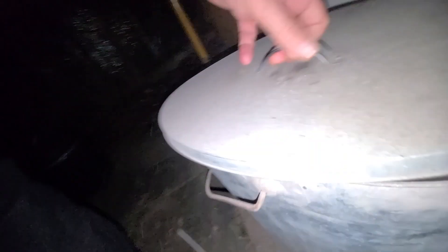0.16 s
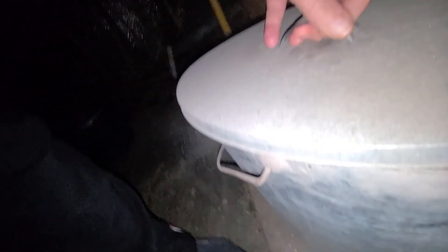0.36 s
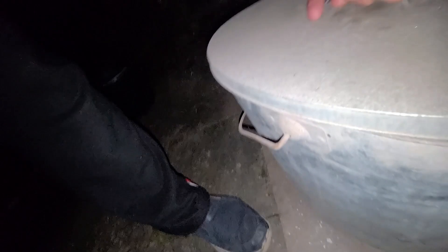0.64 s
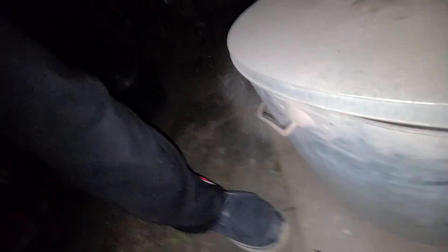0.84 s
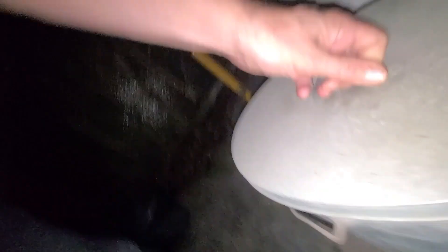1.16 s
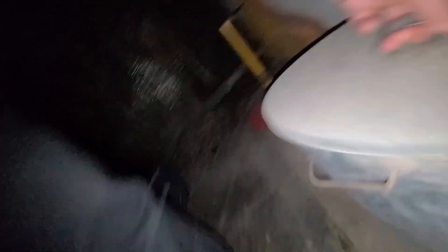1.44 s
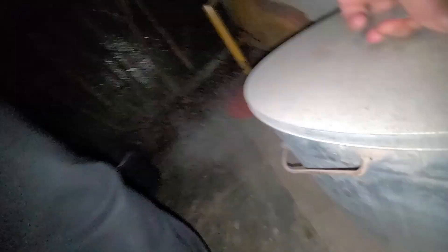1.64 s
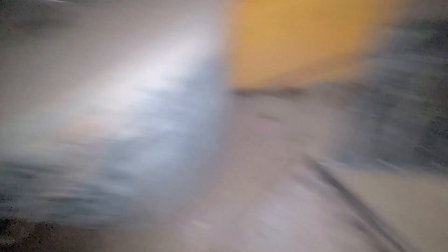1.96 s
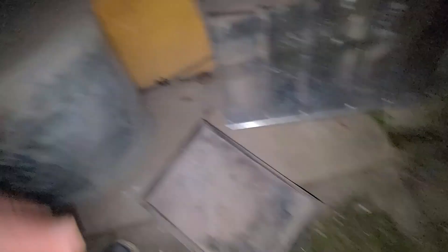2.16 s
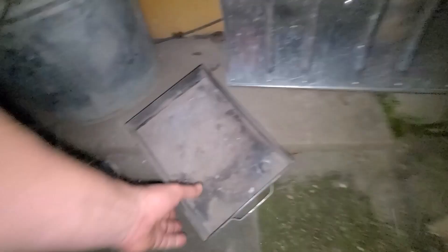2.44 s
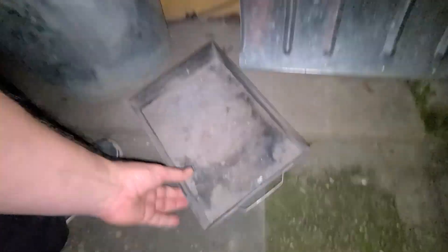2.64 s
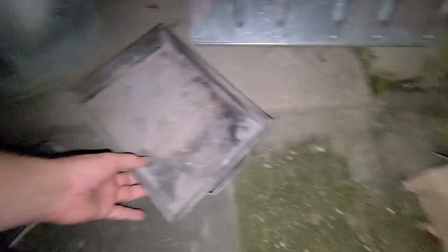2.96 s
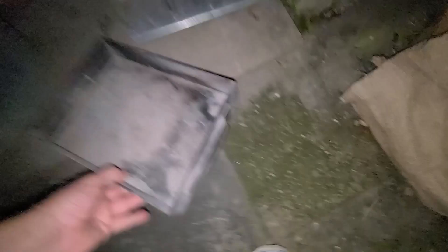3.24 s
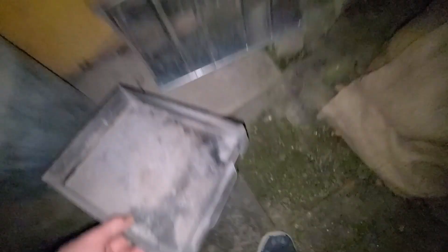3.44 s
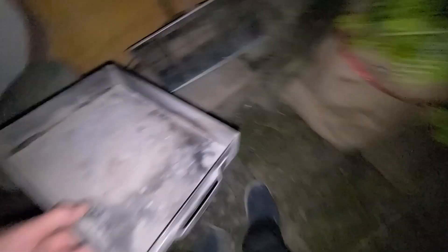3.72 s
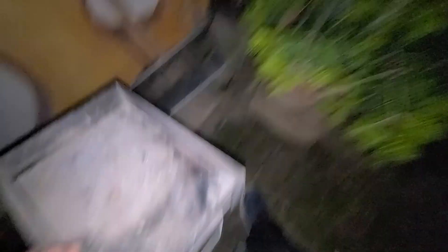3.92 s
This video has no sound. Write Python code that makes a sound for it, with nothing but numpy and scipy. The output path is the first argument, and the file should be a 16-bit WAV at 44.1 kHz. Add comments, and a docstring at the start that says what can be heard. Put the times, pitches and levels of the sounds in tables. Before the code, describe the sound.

Close, dry clattering of sheet metal with low hollow booms, followed by scuffing and one bright ringing clank of a metal tray.

```python
"""A galvanised bin lid, rattled and dropped by hand outdoors, close to a hand-held phone: each blow is a low
boom, a crowd of decaying sheet modes, and bursts of noise for rattle and crack.
A steel ash tray is then lifted off paving: its long modes are fed by five knocks and beam as it turns.
Shoes and clothes scuff in grainy noise, metal scrapes in jagged noise bands, and a low rumble lies beneath."""
import sys
import numpy as np
from scipy import signal
from scipy.fft import rfft, irfft
from scipy.io import wavfile
from scipy.ndimage import uniform_filter1d

SR = 44100
rng = np.random.default_rng(int(sys.argv[2]) if len(sys.argv) > 2 else 0)


def voltage_ratio(decibels):
    """Convert decibels (scalar or array-like) to amplitude ratios, 20 dB per decade."""
    exponent = np.asarray(decibels, float) / 20
    return 10 ** exponent


def unload_wav(signal):
    """Save mono or channel-first audio to the path in sys.argv[1] as 16-bit WAV at rate SR, clipped to [-1, 1]."""
    wavfile.write(
        sys.argv[1],
        SR,
        np.round(np.clip(np.atleast_2d(signal).T, -1, 1) * 32767).astype(np.int16),
    )


N = 180324
TIME = np.arange(N) / SR
EDGE_DB = 25.5  # how far a scuff or scrape has dropped at the ends of its rise and fall


def between(hz, points):
    """Read (Hz, dB) points on a log-frequency axis."""
    at, db = np.transpose(points)
    return np.interp(np.log(hz), np.log(at), db, left=-80, right=-80)


def walk(rate):
    """Random levels held 1 / rate s and slewed twice; spread near 1."""
    hold = int(SR / rate)
    steps = np.repeat(rng.standard_normal(N // hold + 1), hold)
    return 1.16 * uniform_filter1d(uniform_filter1d(steps, hold), hold)[:N]


def colour(x, points, peaks_db=0.):
    """Filter by (Hz, dB) points, to rms 1; peaks_db adds the jagged response of dense sheet-metal modes."""
    bins = N // 2 + 1
    hz = np.maximum(np.arange(bins) * SR / N, 1)
    db = between(hz, points) + peaks_db * walk(300)[:bins]  # here the walk runs along frequency
    y = irfft(rfft(x) * voltage_ratio(db), N)
    return y / np.sqrt(np.mean(y ** 2))


def noise(like):
    """Left and right noise that share a part: like is their correlation."""
    mid, side = rng.standard_normal((2, N))
    like = np.clip(like, 0, 1)
    return np.sqrt((1 + like) / 2) * mid + np.sqrt((1 - like) / 2) * side * np.array([[1], [-1]])


def ring(hz, t, lag_s, skew):
    """A steady mode at both microphone ports: the left hears it lag_s later, skew radians off."""
    turn = np.pi * hz * lag_s + skew / 2
    return np.array([np.sin(2 * np.pi * hz * t - turn), np.sin(2 * np.pi * hz * t + turn)])


def fade(t60):
    """A third of a second of exponential decay."""
    return voltage_ratio(-60 * TIME[:SR // 3] / np.maximum(t60, .005))


def cluster(points, t60, lag_s, count):
    """A crowd of short modes, others at every blow as the grip and the struck spot change."""
    u = rng.random((count, 4))
    pitch, level, decay, phase = u[:, :1], u[:, 1:2], u[:, 2:3], u[:, 3:]
    hz = points[0][0] * (points[-1][0] / points[0][0]) ** pitch
    # higher modes die sooner
    envelope = fade(t60 * (.5 + decay) * (hz / 1000) ** -.25)
    size = voltage_ratio(between(hz, points) + 10 * (level - .5)) * envelope
    skew = 2.57 * (level - decay) * np.minimum(hz / 700, 3)
    return np.sum(size * ring(hz, TIME[:SR // 3] + phase, lag_s, skew), axis=1)


def add(out, s, burst):
    """Mix a burst in from time s on."""
    i = int(s * SR)
    out[..., i:i + burst.shape[-1]] += burst[..., :N - i]


def distance_from_peak(s, rise_s, fall_s):
    """Time away from a peak at s: 0 there, 1 at the ends of rise and fall, held at 10."""
    away = np.where(TIME < s, (s - TIME) / rise_s, (TIME - s) / fall_s)
    return np.minimum(away, 10)


def background():
    """Low thumping rumble from hand and breeze, stronger on the left: noise with a wandering level."""
    # course of the rumble before its wander and left-right offset: (time [s], level [dB])
    course = [(0, -40.5), (1, -41.5), (2.2, -45), (4.09, -50)]
    # relative spectrum of the rumble: (frequency [Hz], level [dB])
    spectrum = [(20, -18), (45, 6.5), (70, 1.5), (140, -8.5), (300, -23.5), (600, -31)]
    db = np.interp(TIME, *np.transpose(course))
    return colour(noise(0.78), spectrum) * voltage_ratio(db + 2.2 * walk(20) + np.array([[3.0], [-3.0]]))


def rubbing():
    """Shoes, cloth and lid rub as grainy body and thin hiss; a hand on the lid makes the drum hum along."""
    # scuffs, before grain and pan:
    # (time of the peak [s], rise [s], fall [s], body level [dB], hiss level [dB])
    scuffs = [(0.02, 0.086, 0.44, -31, -43), (0.488, 0.044, 0.94, -36, -49.5),
              (0.589, 0.028, 0.072, -31.5, -46), (1.14, 0.04, 0.023, -37.5, -48),
              (1.209, 0.031, 0.079, -33.5, -41), (1.7, 0.048, 0.13, -41, -50),
              (1.836, 0.11, 0.12, -32, -40), (1.947, 0.047, 0.022, -32.5, -36.5),
              (2.012, 0.016, 0.11, -25.5, -40.5), (2.064, 0.064, 0.023, -24.5, -41.5),
              (2.369, 0.053, 0.064, -32.5, -46.5), (2.47, 0.12, 0.16, -42, -52.5),
              (2.719, 0.073, 0.28, -44.5, -52), (2.9, 0.025, 0.13, -34.5, -36),
              (3.148, 0.28, 0.37, -41, -49), (3.471, 0.094, 0.12, -36.5, -43),
              (3.6, 0.066, 0.083, -47, -51), (3.764, 0.016, 0.058, -36.5, -49.5)]
    # faint rustle between scuffs: (body level [dB], hiss level [dB])
    still_db = (-55, -64.5)
    # relative spectra of body and hiss: (frequency [Hz], level [dB per Hz])
    body_spectrum = [(120, -4.5), (250, 1), (600, -1.5), (1500, -3), (4000, -12), (6300, -12.5),
                     (7200, -36)]
    hiss_spectrum = [(6500, -3.5), (8500, -1.5), (11700, 2), (16300, -2.5)]
    # side on which the rubbing lies: (time [s], left minus right [dB])
    pan = [(0, 3), (1.15, 33), (1.3, 4), (1.8, 12), (2.04, 39), (2.25, 3.5), (2.37, 31.5), (2.6, 5.5),
           (2.9, 26), (3.15, 8), (4.09, 3)]
    lid_off_s = 1.66

    power = voltage_ratio(2 * np.array(still_db))[:, None] + np.zeros(N)
    for s, rise_s, fall_s, *dbs in scuffs:
        drop_db = EDGE_DB * distance_from_peak(s, rise_s, fall_s) ** 1.55  # higher power = flatter top
        power += voltage_ratio(2 * (np.array(dbs)[:, None] - drop_db))
    body_level, hiss_level = np.sqrt(power)
    # dense grit of uneven size: fast and slower flicker
    grain = voltage_ratio(1.73 * walk(300) + 1.75 * walk(39.86))
    body = colour(noise(0.11) * grain, body_spectrum)
    hiss = colour(noise(0.1) * grain, hiss_spectrum)
    drum = colour(noise(0.85), [(70, -3.0), (125, 3.0), (200, -14.5)]) * (TIME < lid_off_s)
    left = 1 / (1 + voltage_ratio(-2 * np.interp(TIME, *np.transpose(pan))))  # left share of the power
    rub = (body_level * body + hiss_level * hiss) * np.sqrt([left, 1 - left])
    return rub + voltage_ratio(-16.5) * body_level ** 0.58 * drum


def drag():
    """Short gritty scrapes of metal on metal or stone, each exciting its own patch of sheet-metal modes."""
    # scrapes, before flicker and left-right offset:
    # (time of the peak [s], rise [s], fall [s], level [dB], centre frequency [Hz])
    scrapes = [(0.743, 0.013, 0.02, -31.5, 3200), (1.213, 0.026, 0.065, -40, 2700),
               (1.448, 0.03, 0.027, -27.5, 5300), (2.83, 0.13, 0.13, -49.5, 1600)]
    out = 0
    for s, rise_s, fall_s, db, hz in scrapes:
        patch = [(0.31 * hz, -20), (0.93 * hz, 0), (1.09 * hz, -5.0), (2 * hz, -15)]
        scrape = colour(noise(0.16), patch, peaks_db=2.5)
        drop_db = EDGE_DB * distance_from_peak(s, rise_s, fall_s) ** 2
        out = out + scrape * voltage_ratio(db + 4.4 * walk(250) - drop_db)
    return out * voltage_ratio(np.array([[4.5], [-4.5]]))


def tray():
    """Each knock feeds the tray's modes unevenly and jolts their phase; harder ones reach higher modes."""
    # knocks on the paving, levels relative:
    # (time [s], ring level [dB], crack level [dB], hardness [0-1])
    knocks = [(2.918, -5, -35.5, 0.34), (2.951, -7.5, -79, 0.03), (2.976, 0.5, -18, 0.95),
              (3.015, -5.5, -43, 0.67), (3.046, -14.5, -48, 0.4)]
    # tray modes: (frequency [Hz], relative level [dB], decay t60 [s], left minus right [dB])
    modes = [(323, -21.5, 1.8, -2), (421, -1, 0.19, -20), (582, 1, 0.34, -2), (627.3, 0.5, 0.71, 1),
             (680, -7.5, 0.385, 20), (777, -5, 0.69, -12), (909, 1, 0.94, -7), (913, -18.5, 4.2, -9.5),
             (941, 0.5, 0.86, 2), (951, 3, 0.375, 8), (1073.5, -2.5, 2.69, -3.5), (1122, 6, 0.3, 5),
             (1278, -8, 1.63, -1), (1364, 8.5, 0.27, 16.5), (1773, -9.5, 0.98, 12.5), (1940, -12, .26, 6),
             (2017, 5, 0.56, 5), (2360, 6, 0.26, -7.5), (2460, -15, 0.75, 11), (2520, 8.5, .35, 1.5),
             (2800, -7.5, 0.46, 8), (3130, -6.5, 0.49, -5), (3510, -0.5, 0.17, -6), (3570, -18.5, 0.92, 2),
             (3950, -8, 0.31, 4), (4500, -5.5, 0.21, 9)]
    # the tray turns: (time [s], lag of the left microphone port [ms])
    tilt = [(3.24, 0.25), (3.31, 0.33), (3.38, 0.046), (3.5, 0.27), (4.09, 0.23)]
    grip_s = 3.45  # fingers close on the tray floor and stop its lowest mode

    out, crack = np.zeros((2, N)), np.zeros(N)
    first = int(knocks[0][0] * SR)
    t = TIME[first:]
    lag_s = np.interp(t, *np.transpose(tilt)) / 1000
    for hz, db, t60, pan_db in modes:
        energy, shift = 0, rng.random()
        for s, knock_db, _, hard in knocks:
            age = np.maximum(t - s, 0)
            # each knock lands on another spot
            spot_db = 2.43 * rng.standard_normal()
            soft_db = 6.0 * (1 - hard) * np.log2(hz / 1000)
            gain = voltage_ratio(knock_db + spot_db - soft_db - 60 * age / t60)
            energy = energy + gain ** 2 * (1 - np.exp(-age / 0.011))
            jolt = 1.04 * rng.standard_normal()  # radians
            shift = shift + jolt * (1 - np.exp(-age / 0.0019)) / (2 * np.pi * hz)
        if hz == modes[0][0]:
            energy = energy * np.exp(-np.maximum(t - grip_s, 0) / 0.013)
        # the turning tray beams its modes, the high ones most, now towards the phone, now away
        beam_db = 6.1 * min(hz / 1800, 1) ** 2 * walk(20.4)[:len(t)]
        level = voltage_ratio(db - 22 + beam_db + np.array([[pan_db], [-pan_db]]) / 2)
        out[:, first:] += level * np.sqrt(energy) * ring(hz, t + shift, lag_s, 0)

    for s, knock_db, crack_db, hard in knocks:
        clank = [(170, -20.0), (280, -9.5), (600, 1.0), (2500, 2.5), (5200, -30 * (1 - hard))]
        add(out, s, voltage_ratio(knock_db - 23.0) * cluster(clank, 0.22, lag_s[0], count=34))
        add(crack, s, voltage_ratio(crack_db) * fade(0.3))
    crack_spectrum = [(1000, 16.5), (5000, 3.5), (7500, -7.5), (12000, -9.5), (16300, -15.0)]
    return out + crack * colour(noise(0.064), crack_spectrum, peaks_db=3.0) * voltage_ratio(4.0)


def bin_lid():
    """Each blow of the lid booms at the pitch the held lid allows, rings a crowd of sheet modes, rattles and
    cracks; a foot thump at 1.901 s is made the same way."""
    # lid on drum, and at 1.901 s a foot thump; levels relative: (time [s], sheet level [dB], boom frequency
    # [Hz], boom level [dB], # crack level [dB], base decay t60 that each layer scales [s])
    blows = [(0.146, -26, 94, -27, -25, 0.2), (0.173, -21, 130, -25, -18.5, 0.34),
             (0.225, -21, 116, -26.5, -22, 0.29), (0.596, -20, 134.4, -20.5, -33, 0.21),
             (0.666, -16, 143.8, -19, -31.5, 0.13), (0.697, -11.5, 103.8, -15.5, -31, 0.36),
             (0.749, -6.5, 78.2, -14.5, -26, 0.16), (0.773, -19, 117, -24, -27.5, 0.13),
             (0.825, -19.5, 110.5, -24.5, -40, 0.12), (0.963, -11.5, 99.3, -16, -25.5, 0.19),
             (1.024, -16.5, 108, -20, -33.5, 0.22), (1.419, -12, 134, -26.5, -30.5, 0.35),
             (1.453, -1.5, 83.7, -16.5, -14.5, 0.18), (1.479, -6.5, 113.7, -20, -19, 0.12),
             (1.593, -14.5, 105.7, -30.5, -23.5, 0.1), (1.901, -41, 84.3, -32, -51, 0.25)]
    # drum and lid modes: (frequency [Hz], relative level [dB])
    sheet = [(150, 0), (300, -1), (800, -4), (1500, -14)]
    # single clinks and taps: (time [s], frequency [Hz], relative level [dB], decay t60 [s])
    clinks = [(.176, 1800, -11.5, 0.1), (0.3, 2760, -41.5, 0.56), (.83, 753, -31.5, 0.45),
              (0.961, 4140, -21, 0.17), (1.425, 4700, -30, 0.17), (2.458, 286, -33.5, 0.05),
              (3.923, 273, -31, 0.028)]
    lag_s, boom_s = -0.00034, 0.044  # left port hears the bin first; decay time of the boom

    out, rattle, crack, spit = np.zeros((2, N)), np.zeros(N), np.zeros(N), np.zeros(N)
    t = TIME[:SR // 3]
    for s, sheet_db, boom_hz, boom_db, crack_db, t60 in blows:
        # the hand soon smothers the boom: a rounded knock
        knock = np.exp(-(t / boom_s) ** 1.03) * (1 - fade(0.012))
        add(out, s, voltage_ratio(boom_db + 6.0) * knock * ring(boom_hz, t, lag_s, 0.55))
        add(out, s, voltage_ratio(sheet_db - 18.5) * (1 - fade(0.0053)) * cluster(sheet, t60, lag_s, count=30))
        add(rattle, s, voltage_ratio(sheet_db - 15.0) * (1 - fade(0.054)) * fade(1.8 * t60))
        # the crack's mids swell in; its treble spits 2 ms late and dies sooner
        add(crack, s, voltage_ratio(crack_db) * (1 - fade(0.039)) * fade(1.11 * t60))
        spit_shape = (1 - 0.55 * fade(0.014)) * fade(0.79 * t60) + fade(0.003)
        add(spit, s + 0.002, voltage_ratio(crack_db - 4.5) * spit_shape)
    for s, hz, db, t60 in clinks:
        add(out, s, voltage_ratio(db) * fade(t60) * ring(hz, t, lag_s, 0))

    # the loose rim buzzes: too many short modes to tell apart
    buzz = colour(noise(0.15), sheet + [(4000, -55)], peaks_db=4.5)
    out += rattle * buzz * voltage_ratio(0.58 * walk(98.0))
    mid_spectrum = [(600, -1.5), (1700, 3.5), (3200, 0.5), (5000, -20.0)]
    high_spectrum = [(3500, 2.0), (6200, -1), (7500, -9.0), (12000, -13.5), (16300, -23.0)]
    mids = crack * colour(noise(0.05), mid_spectrum, peaks_db=3.0)
    highs = spit * colour(noise(0.21), high_spectrum, peaks_db=4.0)
    cracks = (mids + highs) * voltage_ratio(0.41 * walk(300) + np.array([[3.0], [-3.0]]))
    return out * voltage_ratio(np.array([[1.3], [-1.3]])) + cracks


def scene():
    """All sources, outdoors and close, with no reverberation added."""
    return background() + rubbing() + drag() + tray() + bin_lid()


def band_limit(x):
    """A steep low-pass at the top of the band."""
    return signal.sosfilt(signal.butter(12, 16450, fs=SR, output="sos"), x)


def record(dry):
    """The phone's microphone cuts the deepest bass and rounds its loudest peaks."""
    bass_cut = signal.butter(2, 38, "high", fs=SR, output="sos")
    mix = np.tanh(0.8 * signal.sosfilt(bass_cut, dry)) / 0.81
    return band_limit(mix)


dry = scene()
out = record(dry)
unload_wav(out)
```